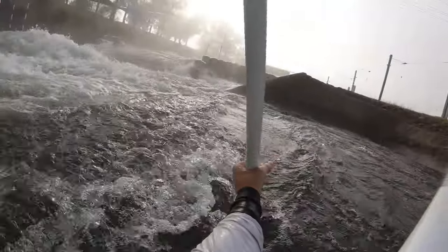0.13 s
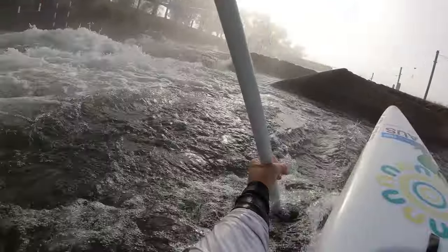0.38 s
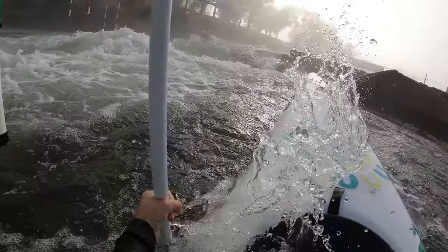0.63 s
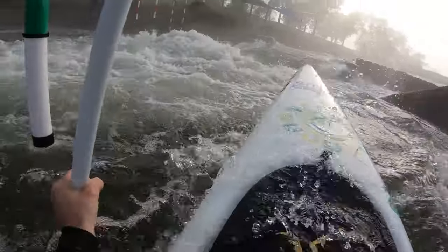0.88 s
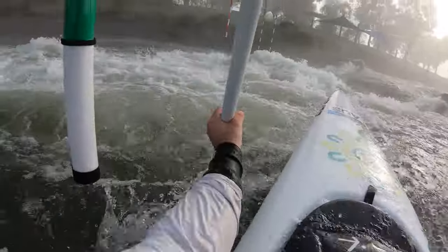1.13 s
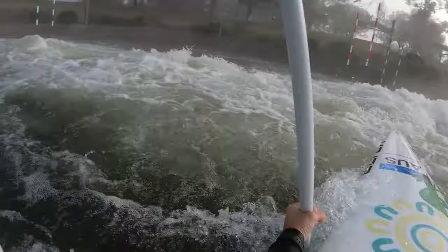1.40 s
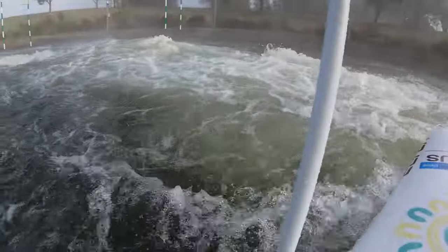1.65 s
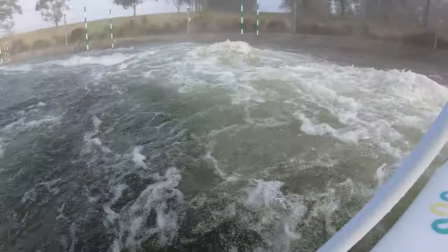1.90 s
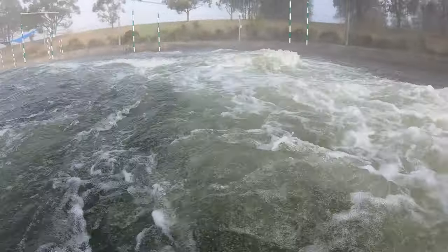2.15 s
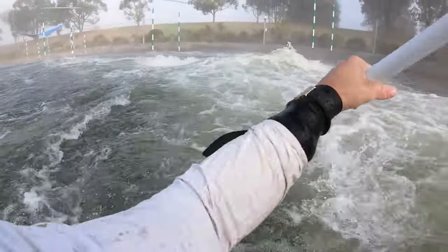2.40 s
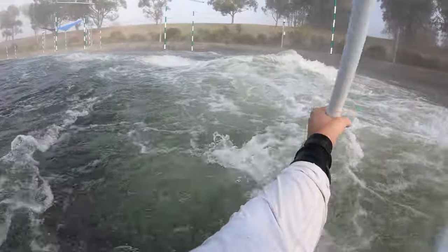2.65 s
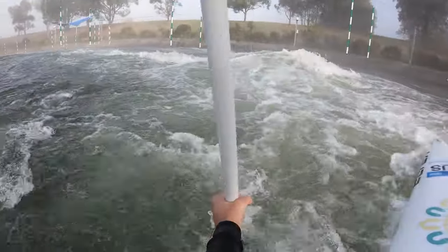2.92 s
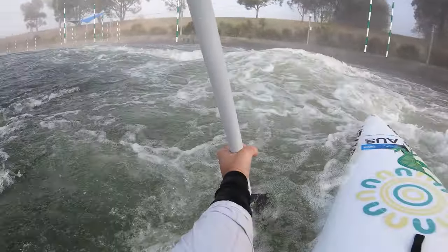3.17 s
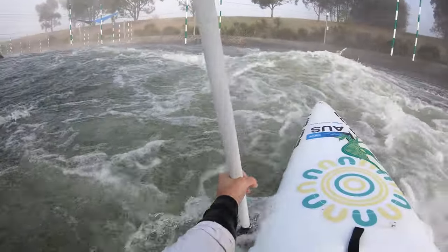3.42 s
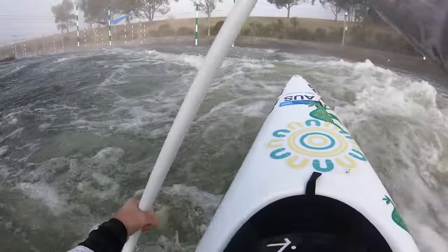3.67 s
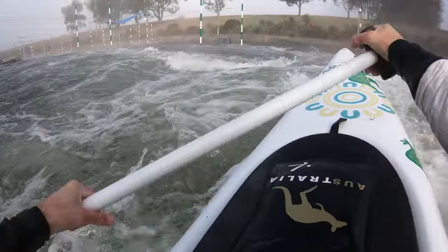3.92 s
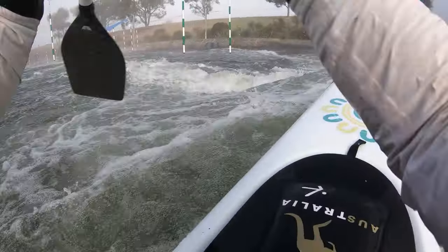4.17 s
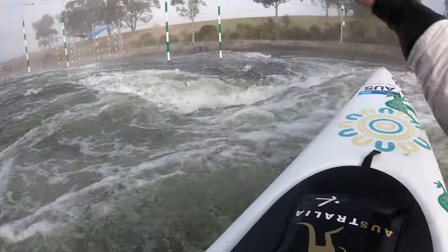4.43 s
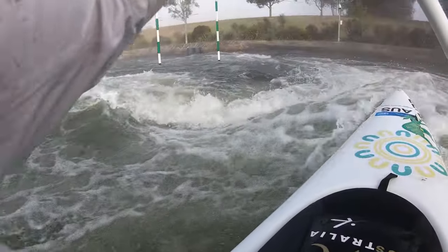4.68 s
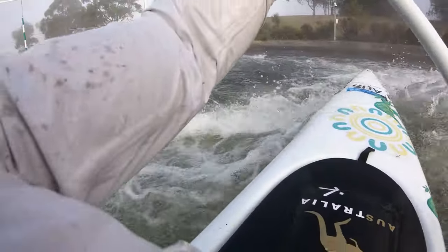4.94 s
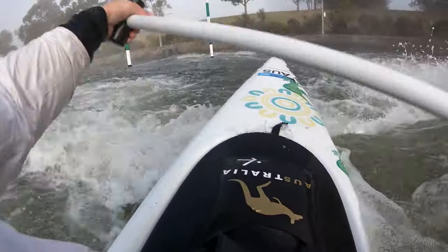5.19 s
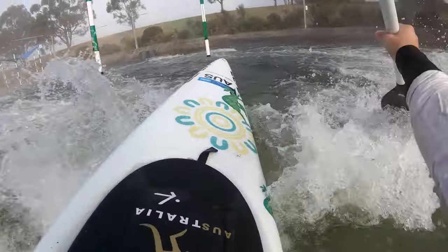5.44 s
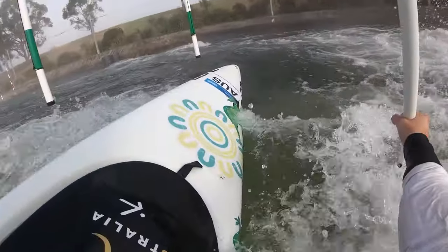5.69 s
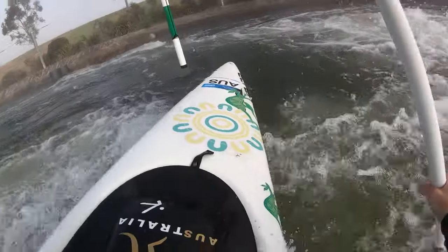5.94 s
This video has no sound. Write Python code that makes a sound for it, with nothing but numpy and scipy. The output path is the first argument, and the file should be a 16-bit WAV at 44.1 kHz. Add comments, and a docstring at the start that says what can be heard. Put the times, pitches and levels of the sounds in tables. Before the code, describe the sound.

Muffled whitewater roars and froths close around a small boat, with gurgling foam, drop knocks, a hollow deck slap and spray bursts.

```python
"""Whitewater roars and froths close round a canoe: noise and rising bubbles through resonances and spectra.
One microphone in a sealed helmet camera hears it, the treble muffled and a few hollows in the colour.
Below, noise bands make the booming hull, the deep surges and the air on the case; jolts swing the pressure.
Nearest, drops knock on the case, droplets ring on the lens and sheets of spray wash over it as grainy noise;
bubbles plop, the bow gulps air, and one wave slaps the deck in quick ringing blows."""
import sys
import numpy as np
from scipy import signal
from scipy.fft import rfft, irfft, next_fast_len
from scipy.io import wavfile
from scipy.ndimage import uniform_filter1d, map_coordinates

SR = 44100
rng = np.random.default_rng(int(sys.argv[2]) if len(sys.argv) > 2 else 0)


def dump(signal):
    """Clip the signal to [-1, 1] and save it as 16-bit WAV at the path in sys.argv[1]."""
    limited = np.clip(np.atleast_2d(signal).T, -1, 1)
    pcm = np.round(limited * 32767).astype(np.int16)
    wavfile.write(sys.argv[1], SR, pcm)


def invert_db(level):
    """Linear amplitude ratio for a level in decibels (20 dB per decade), elementwise."""
    return 10 ** (np.asarray(level, dtype=float) / 20)


N = 267687  # length [samples]


def unit(x):
    """Scales a sound to rms 1."""
    return x / np.sqrt(np.mean(x ** 2) + 1e-20)


def along(points, hz):
    """Reads (frequency [Hz], value) points on a log frequency axis."""
    f, v = np.transpose(points)
    return np.interp(np.log(hz + 1), np.log(f + 1), v)


def wobble(rate):
    """A smooth random curve with rate knots a second."""
    knots = rng.standard_normal(int(N * rate / SR) + 4)
    return map_coordinates(knots, [np.arange(N) * rate / SR])


def filtered(x, response):
    """Multiplies the spectrum of x by a response, real or complex, of frequency."""
    m = next_fast_len(N + SR // 2)
    return irfft(rfft(x, m) * response(np.fft.rfftfreq(m, 1 / SR)), m)[:N]


def coloured(x, spectrum):
    """Passes x through a (frequency [Hz], level [dB]) spectrum, at rms 1."""
    return unit(filtered(x, lambda hz: invert_db(along(spectrum, hz))))


def unsteady_noise(spectrum, depth_db, rate):
    """Coloured noise whose level wanders at random, at rms 1."""
    return unit(invert_db(depth_db * wobble(rate)) * coloured(rng.standard_normal(N), spectrum))


def resonant(x, modes, top_hz):
    """Passes x through causal resonances of alternating sign and a steep low-pass, at rms 1."""
    def response(f):
        total = 0
        for k, (centre, width, db) in enumerate(modes):
            mode = 1j * f * width / (centre * centre - f * f + 1j * f * width)
            total = total + (-1) ** k * invert_db(db) * mode
        return total / (1 + 1j * f / top_hz) ** 4
    return unit(filtered(x, response))


def churn(patchy_db):
    """Broken water as white noise with patches of random gain in time and frequency."""
    z = signal.stft(rng.standard_normal(N), nperseg=512)[2]
    field = uniform_filter1d(rng.standard_normal(z.shape), size=4, axis=0)
    field = uniform_filter1d(field, size=10, axis=1)
    return unit(signal.istft(z * invert_db(patchy_db * unit(field)), nperseg=512)[1][:N])


def bubbles(hz, spread, cycles, scatter_db, count):
    """Bubbles ring for a few cycles, pitch rising as they near the surface."""
    draw, t = rng.random((count, 2)), np.arange(600) / SR
    pitch = hz * np.exp(spread * rng.standard_normal((count, 1)))
    age = t * pitch / cycles
    ring = age * np.exp(-3 * age) * np.sin(2 * np.pi * pitch * t * (1 + .12 * age))
    size = invert_db(-scatter_db * np.log(draw[:, 1:]))
    where = (draw[:, :1] * N).astype(int) + np.arange(len(t))
    return unit(np.bincount(where.ravel(), (size * ring).ravel())[:N])


def swells(calm_db, events):
    """Gain of a calm level with a bell-shaped swell for each event, powers added."""
    t = np.arange(N) / SR
    power = invert_db(calm_db) ** 2
    for s, db, length in events:
        power = power + invert_db(db) ** 2 * np.exp(-((t - s) / length) ** 2)
    return np.sqrt(power)


def controls(rows):
    """Each column after the time, about its mean, one value per sample."""
    s, *columns = np.transpose(rows)
    return [np.interp(np.arange(N) / SR, s, c - c.mean()) for c in columns]


def add_at(out, s, sound):
    """Adds a short sound into out, starting at s seconds."""
    out[round(s * SR):][:len(sound)] += sound


# colour of the air on the case: (frequency [Hz], relative level [dB per Hz])
BUFFET_COLOUR = [(10, -28.5), (22, -9), (45, 1.5), (65, -7.5), (200, -120)]
# gusts on the case: (time of the peak [s], level [dB], length [s])
AIR_GUSTS = [(0.394, -32.5, 0.12), (1.05, -44, 0.092), (2.108, -36, .35), (3.094, -35.5, 0.069),
             (3.8, -40, 0.1), (4.15, -33, .08), (4.5, -36, 0.17), (5.432, -30, 0.055), (5.84, -37, 0.2)]


def buffet():
    """Air buffets the case: unsteady low noise that swells with each gust."""
    return swells(-42, AIR_GUSTS) * unsteady_noise(BUFFET_COLOUR, depth_db=2.2, rate=9.6)


# the camera is jolted: (time [s], level [dB], frequency [Hz])
CAMERA_JOLTS = [(.185, -19, 28), (4.045, -16, 24)]


def jolt():
    """Each jolt is one slow swing of pressure in the sealed case."""
    out, t = np.zeros(N), np.arange(SR // 6) / SR
    for s, db, hz in CAMERA_JOLTS:
        add_at(out, s, invert_db(db) * np.sin(2 * np.pi * hz * t) * np.exp(-(t / .04) ** 2))
    return out


# colour of the deep water: (frequency [Hz], relative level [dB per Hz])
DEEP_COLOUR = [(20, -60), (45, -13), (60, -2.5), (115, 0.5), (160, -9.5), (400, -45), (900, -120)]
# deep surges under the boat: (time of the peak [s], level [dB], length [s])
DEEP_SURGES = [(0.04, -29, 0.18), (0.555, -28, 0.089), (0.957, -31.5, 0.13), (1.443, -28.5, 0.32),
               (2.197, -29.5, 0.081), (2.782, -23.5, 0.024), (4.045, -21.5, 0.021), (5.387, -44, 0.092),
               (5.78, -33.5, 0.094)]


def rumble():
    """Deep water surges under the boat: low noise of wandering level."""
    return swells(-36, DEEP_SURGES) * unsteady_noise(DEEP_COLOUR, depth_db=1.0, rate=13)


# colour of the hollow hull: (frequency [Hz], relative level [dB per Hz])
HULL_COLOUR = [(60, -64.5), (125, -15.5), (155, -1), (175, -1), (195, -3), (222, -1.5), (250, -6.5),
               (300, -14), (600, -93.5)]
# waves that set the hull booming: (time of the peak [s], level [dB], length [s])
HULL_WAVES = [(0.297, -23.5, 0.07), (0.562, -23.5, 0.24), (1.31, -28, 0.043), (1.474, -25.5, 0.089),
              (2.3, -26, 0.068), (2.542, -28.5, 0.25), (2.952, -25.5, 0.097), (3.543, -25.5, 0.14),
              (3.851, -21, 0.15), (4.872, -28.5, 0.27), (5.439, -21.5, 0.12), (5.666, -16, 0.036),
              (5.87, -19, 0.14)]


def boom():
    """Waves boom in the hollow hull: a noise band with a swell for each wave."""
    return swells(-31.5, HULL_WAVES) * unsteady_noise(HULL_COLOUR, depth_db=0.15, rate=17)


# colour of fine spray in the air: (frequency [Hz], relative level [dB per Hz])
HISS_COLOUR = [(800, -34), (2000, 2), (2550, -2), (2950, -5.5), (3500, -11.5), (3800, -13), (4100, -11),
               (4600, -23), (5100, -31), (6500, -34.5), (8000, -39), (9800, -44.5), (10600, -59.5),
               (12000, -120)]
# colour of the falling showers: (frequency [Hz], relative level [dB per Hz])
SHOWER_COLOUR = [(2200, -40), (2650, -6), (2900, 2.5), (3200, -10), (3800, -16.5), (4300, -17),
                 (5200, -51.5)]
# showers of spray falling back on the water: (time of the peak [s], level [dB], length [s])
SPRAY_SHOWERS = [(0.078, -50, 0.18), (0.5, -54.5, 0.062), (1.002, -54, 0.18), (2.957, -48.5, 0.041),
                 (3.07, -52, 0.07), (5.309, -52.5, 0.044)]


def spray(spray_db, surge):
    """Fine spray hisses in the air and showers fall back: patchy noise and tiny bubbles."""
    spatter = churn(patchy_db=1.5)
    spatter = spatter + invert_db(-11.5) * bubbles(hz=4700, spread=0.48, cycles=5, scatter_db=-0.3, count=5000)
    flicker_db = 1.2 * surge + 0.95 * wobble(32)
    hiss = invert_db(-47.5 + spray_db + flicker_db) * coloured(spatter, HISS_COLOUR)
    other_spatter = np.roll(spatter, N // 2)  # the same spatter, half the length later
    return hiss + swells(-62.5, SPRAY_SHOWERS) * coloured(other_spatter, SHOWER_COLOUR)


# sound of water on the case: (frequency [Hz], relative level [dB])
CASE_COLOUR = [(300, -29.5), (1500, -0.5), (2000, 8), (2600, 5), (3300, -4.5), (4600, -15), (5600, -27.5),
               (8000, -38.5), (10000, -41.5), (11000, -77), (13000, -120)]
# sheets of spray: (time of the peak [s], level [dB], brightness above 4.5 kHz [dB], rise [s], fall [s])
SPRAY_SHEETS = [(.12, -53, 6, 0.085, 0.092), (0.472, -45, 5, 0.0095, 0.091), (1.0, -52.5, 3.5, .1, 0.11),
                (2.955, -44.5, -5, 0.044, 0.094), (4.358, -31, 0, 0.0061, 0.0091),
                (4.376, -36.5, -2, 0.0086, 0.019), (4.436, -42, -5, 0.02, 0.027),
                (4.455, -40, 8, 0.013, 0.0098), (4.472, -42, 3, 0.0041, 0.005),
                (4.481, -37, 6, 0.0032, 0.005), (4.494, -46, 0.5, .006, 0.018),
                (4.56, -46, -4, 0.054, 0.23), (5.315, -41, 4, 0.022, 0.022),
                (5.442, -34.5, 3, 0.0065, 0.009), (5.459, -39, 3, 0.0078, 0.014),
                (5.478, -43, 0, .012, 0.0099), (5.5, -42, 6, 0.013, 0.016),
                (5.521, -30.5, 1, 0.0099, 0.0023), (5.73, -45, 5, 0.044, 0.042)]


def sheets():
    """Spray washes over the case: a grainy rush that swells and dies."""
    t, out = np.arange(N) / SR, np.zeros(N)
    rush = coloured(invert_db(1.3 * wobble(250)) * rng.standard_normal(N), CASE_COLOUR)
    body = filtered(rush, lambda hz: hz < 4500)
    treble = rush - body
    for s, db, bright_db, rise, fall in SPRAY_SHEETS:
        swell = invert_db(db) * np.exp(-(np.abs(t - s) / np.where(t < s, rise, fall)) ** 1.3)
        out += swell * (body + invert_db(bright_db) * treble)
    return out


# colour of a drop on the case: (frequency [Hz], relative level [dB])
KNOCK_COLOUR = [(600, -30), (1500, -11), (2100, -6), (2700, 0), (3300, -6), (4100, -15), (5000, -30),
                (6200, -31), (8000, -26), (10000, -35), (11000, -70)]
# drops on the case: (time [s], peak level under 5 kHz [dB], peak level above 5 kHz [dB])
CASE_DROPS = [(0.7262, -32, -72), (0.737, -25.5, -53.5), (0.7665, -53, -68), (0.846, -50, -58.5),
              (0.85, -23, -60), (0.854, -26, -55), (0.8945, -50, -58), (1.0352, -20.5, -48),
              (1.0784, -34, -61), (2.5942, -35, -73), (3.6147, -43, -62), (3.6834, -54, -81),
              (3.807, -50, -55), (3.8174, -44, -58), (3.9155, -31, -54), (4.0018, -50, -59),
              (4.0337, -14, -45.5), (5.3757, -45, -63), (5.57, -37, -68), (5.8374, -37, -71)]


def drops():
    """Each drop is a sharp blow and faint wet rattle on the plastic case; the crack on top has its own level."""
    t, out = np.arange(512) / SR, np.zeros(N)
    lead = 128  # room ahead of the blow for the band split [samples]
    hz = np.fft.rfftfreq(len(t), 1 / SR)
    # folding the cepstrum makes the case ring only after the blow (minimum phase)
    cepstrum = irfft(np.log(invert_db(along(KNOCK_COLOUR, hz))))
    cepstrum[1:256] *= 2
    cepstrum[257:] = 0
    case = np.exp(rfft(cepstrum))
    low = 1 / (1 + (hz / 5000) ** 16)
    for s, low_db, high_db in CASE_DROPS:
        rattle = .15 * np.exp(-t / .0006) * rng.standard_normal(len(t))
        blow = rfft(np.roll((t == 0) + rattle, lead))
        for db, band in (low_db, low), (high_db, 1 - low):
            part = irfft(blow * case * band)
            out[round(s * SR) - lead:][:len(t)] += invert_db(db) * part / np.abs(part).max()
    return out


# big bubbles close by: (time [s], strength [dB], starting pitch [Hz])
CLOSE_BUBBLES = [(0.511, -12.5, 790), (0.625, -7, 810), (0.892, -6, 860), (1.512, -10, 836),
                 (2.195, -7.5, 780)]
# droplets that ring on the lens: (time [s], strength [dB], starting pitch [Hz])
LENS_DROPLETS = [(.470, -36, 4400), (.474, -45, 4560), (.865, -54, 7300), (.951, -57, 7400),
                 (4.022, -34, 3900), (4.354, -38, 4750), (4.356, -20, 2700), (4.366, -21, 2100),
                 (4.374, -29, 3200), (4.378, -42, 4800), (4.418, -27, 2300), (4.428, -23, 2250),
                 (4.434, -25, 2600), (4.442, -25, 2400), (4.449, -26, 2600), (4.469, -36, 4600),
                 (4.482, -38, 4600), (4.493, -41, 4500), (5.318, -44, 4750), (5.441, -25, 2600),
                 (5.446, -22, 2250), (5.456, -21, 2450), (5.459, -40, 4800), (5.513, -21, 2350),
                 (5.516, -37, 4870), (5.517, -25, 2800), (5.521, -22, 2100), (5.726, -43, 4730)]
# pockets of air gulped under the bow as it ploughs in: (time [s], strength [dB], starting pitch [Hz])
BOW_GULPS = [(5.364, -7.5, 440), (5.408, -5, 280), (5.414, -8, 230), (5.423, -6, 190), (5.432, -4, 200),
             (5.456, -6, 360), (5.485, -10, 420), (5.51, -6, 330)]


def plops_pings_and_gulps():
    """Each bubble, droplet or air pocket rings briefly, its pitch rising."""
    out, t = np.zeros(N), np.arange(SR // 20) / SR
    for rows, life_s in (CLOSE_BUBBLES, 0.0038), (LENS_DROPLETS, 0.0017), (BOW_GULPS, 0.0071):
        envelope = np.exp(-t / life_s) * (1 - np.exp(-t / 0.0012))
        for s, db, hz in rows:
            add_at(out, s, invert_db(db) * np.sin(2 * np.pi * hz * t * (1 + 5 * t)) * envelope)
    return out


# blows of the slap: (time [s], strength [dB], brightness [dB per octave], pitch factor)
# less water on the deck rings higher
SLAP_BLOWS = [(1.478, -10.5, 5.5, 0.95), (1.484, -9.5, -7, 0.99), (1.4918, -9, 0.5, 1),
              (1.499, -6, -4.5, .98), (1.505, -9, 3, 1.0), (1.511, -16, -0.5, 1.15)]
# modes of the wet deck: (frequency before the pitch factor [Hz], relative level [dB], decay by 60 dB [s])
DECK_MODES = [(172, 0, 0.037), (437, -11, 0.072), (760, -15, 0.03), (1363, -5, 0.028), (1422, -7.5, 0.066),
              (2280, -30, 0.033)]
# the front of the wave clacks on the deck: (time [s], strength [dB], starting pitch [Hz], decay by 60 dB [s])
WAVE_FRONT_CLACK = (1.473, -30, 2150, .07)


def slap():
    """Quick blows ring the wet deck, each mode at a new strength, pitch sliding up."""
    out, t = np.zeros(N), np.arange(SR // 10) / SR
    for s, db, tilt_db, pitch in SLAP_BLOWS:
        ring = np.zeros(len(t))
        for hz, level, t60 in DECK_MODES:
            mode_db = level + tilt_db * np.log2(hz / 500) + 1.7 * rng.normal()
            ring += invert_db(mode_db - 60 * t / t60) * np.sin(2 * np.pi * hz * pitch * t * (1 + 2.3 * t))
        # water on the deck roughens the ring
        ring *= 1 + .4 * map_coordinates(rng.standard_normal(64), [t * 500])
        add_at(out, s, invert_db(db) * ring * (1 - np.exp(-(t / 0.0029) ** 2)))
    s, db, hz, t60 = WAVE_FRONT_CLACK
    clack = invert_db(db - 60 * t / t60) * np.sin(2 * np.pi * hz * t * (1 + t))
    add_at(out, s, clack * (1 - np.exp(-t / .003)))
    return out


# colour of a breaking crest: (frequency [Hz], relative level [dB per Hz])
CREST_COLOUR = [(900, -39), (1250, -9), (1420, 5), (1650, -4.5), (1850, -11), (2400, -33), (3500, -70)]
# breaking crests that brighten the froth: (time of the peak [s], level [dB], length [s])
BREAKING_CRESTS = [(.05, -36.5, 0.17), (1.0, -38, .12), (1.88, -31.5, 0.039), (2.97, -30.5, 0.063),
                   (3.03, -31, 0.032), (3.11, -33, 0.058), (3.95, -35, .08), (4.9, -47.5, 0.088),
                   (5.28, -31.5, .06), (5.52, -34, 0.026), (5.77, -32, 0.04), (5.93, -35, 0.073)]


def crests():
    """Breaking crests gurgle: patchy noise under long-ringing bubbles, a swell for each crest."""
    gurgle = churn(patchy_db=2.0)
    gurgle = gurgle + invert_db(4) * bubbles(hz=1444, spread=.15, cycles=14, scatter_db=0.5, count=3500)
    return swells(-44, BREAKING_CRESTS) * coloured(gurgle, CREST_COLOUR)


# colour of the foam: (frequency [Hz], relative level [dB per Hz])
FROTH_COLOUR = [(200, -41), (600, -1.5), (1000, -3.5), (1250, -2.5), (1450, -9.5), (1750, -13.5),
                (2100, -24), (2600, -34), (4000, -80)]


def froth(foam_db, surge):
    """Foam fizzes beside the boat: patchy noise and many small bubbles, louder as it comes nearer."""
    fizz = churn(patchy_db=-0.7)
    fizz = fizz + invert_db(-7) * bubbles(hz=1390.6, spread=0.2714, cycles=9.34, scatter_db=-0.7, count=6000)
    return invert_db(-25.5 + foam_db + 0.069 * surge) * coloured(fizz, FROTH_COLOUR)


# low roar resonances: (frequency [Hz], width [Hz], level [dB])
LOW_ROAR_MODES = [(342, 104, -2), (483, 290, -5)]
# high roar resonances: (frequency [Hz], width [Hz], level [dB])
HIGH_ROAR_MODES = [(686, 167, -2.5), (893, 188, 0.5)]


def roar(deep_db, high_db, surge):
    """Breaking water roars: churned noise and large bubbles through low and high resonances."""
    top_hz = 1370  # the sealed case muffles the roar above this
    gulps = churn(patchy_db=-0.5)
    gulps = gulps + invert_db(-3) * bubbles(hz=553.5, spread=0.3956, cycles=6.35, scatter_db=.5, count=9000)
    other_gulps = np.roll(gulps, N // 2)  # the same water, half the length later
    low = invert_db(-23 - .5 + deep_db + 0.075 * surge) * resonant(gulps, LOW_ROAR_MODES, top_hz)
    high = invert_db(-25.5 + high_db + 0.39 * surge) * resonant(other_gulps, HIGH_ROAR_MODES, top_hz)
    return low + high


# how heavily water breaks round the boat, heard about the mean: (time [s], deep roar [dB], high roar [dB])
BREAKING_WATER = [(0, -28, -26.5), (.22, -22, -28), (.45, -22, -26), (.65, -24, -22.5), (.9, -25, -25),
                  (1.15, -24.5, -26.5), (1.4, -24.5, -25.5), (1.6, -26.5, -26.5), (2.0, -24, -26),
                  (2.28, -22, -23.5), (2.42, -26, -25.5), (2.72, -22.5, -23.5), (2.85, -26, -26),
                  (3.0, -25, -29), (3.18, -28, -31), (3.3, -24.5, -25.5), (3.55, -22.5, -25.5),
                  (3.97, -23.5, -22), (4.1, -27.5, -26.5), (4.5, -23.5, -25), (4.88, -21, -24),
                  (5.15, -23.5, -21.5), (5.32, -19.5, -24), (5.45, -22, -24.5), (5.6, -28, -23),
                  (5.75, -20.5, -26.5), (6.07, -24, -24)]
# white water close to the boat, heard about the mean: (time [s], nearness of foam [dB], fine spray [dB])
CLOSE_FOAM = [(0, -25, -53.5), (.42, -29, -55), (.6, -28, -56.5), (.8, -32, -53.5), (1.05, -24, -53.5),
              (1.22, -29, -53.5), (1.75, -31, -55.5), (2.2, -31.5, -57), (2.5, -29, -53),
              (2.82, -31, -55.5), (3.0, -30, -54), (3.25, -30, -55), (3.6, -31.5, -54.5),
              (3.9, -30.5, -52.5), (4.25, -30.5, -55), (4.65, -31, -56), (4.92, -28.5, -55.5),
              (5.15, -28.5, -58), (5.3, -25.5, -53.5), (5.55, -29, -50), (5.82, -24, -51.5),
              (6.07, -27, -54.5)]


def water():
    """The whole flow: heavier water lifts the roars, nearer foam the froth, more spray the hiss."""
    deep_db, high_db = controls(BREAKING_WATER)
    foam_db, spray_db = controls(CLOSE_FOAM)
    surge = wobble(17)  # shared by roar, froth and hiss
    low_end = buffet() + rumble() + boom()
    broken = roar(deep_db, high_db, surge) + froth(foam_db, surge) + crests()
    return low_end + broken + spray(spray_db, surge)


# fixed hollows in the colour of the case: (frequency [Hz], width [Hz], depth [0-1])
CASE_HOLLOWS = [(1023, 39, 0.3), (2548, 220, 0.6), (3900, 400, 0.2)]
# a hollow in the roar that comes and goes as the head turns: (time [s], depth [0-1])
HEAD_TURN_HOLLOW = [(0, 0.53), (.5, 0.34), (1.0, 0), (1.3, 0.42), (2.3, 0.69), (3.599, 0.6), (3.9, 0),
                    (5.3, 0.18), (5.65, 0.43), (6.07, .6)]


def hollowed(x):
    """The case takes fixed hollows out of the water's sound, and one that drifts in depth."""
    def bell(f, hz, width_hz):
        return np.exp(-((f - hz) / width_hz) ** 2 * 2)

    def case(f):
        return np.prod([1 - np.clip(depth, 0, 1) * bell(f, hz, w) for hz, w, depth in CASE_HOLLOWS], axis=0)

    x = filtered(x, case)
    depth = np.clip(np.interp(np.arange(N) / SR, *np.transpose(HEAD_TURN_HOLLOW)), 0, 1)
    return x - depth * filtered(x, lambda f: bell(f, 583.4, 62))


def scene():
    """Everything reaches the one microphone in the case."""
    on_case = drops() + sheets() + jolt()
    return (hollowed(water()) + plops_pings_and_gulps() + on_case + slap())[None]


def roll_off(x):
    """The treble ends steeply here."""
    return signal.sosfilt(signal.butter(12, 10700, fs=SR, output="sos"), x)


def record(dry):
    """Hands on the finished mix from the helmet microphone."""
    return roll_off(dry)


dry = scene()
out = record(dry)
dump(out)
```